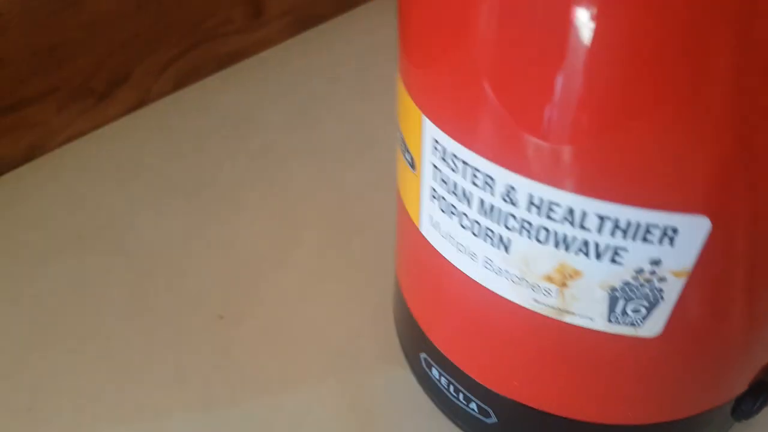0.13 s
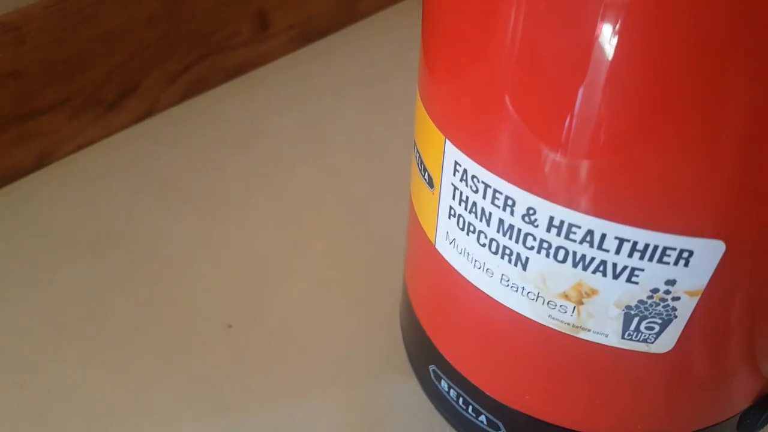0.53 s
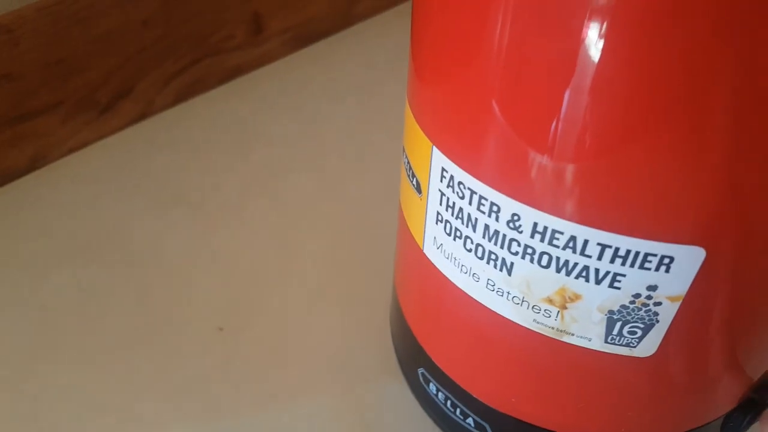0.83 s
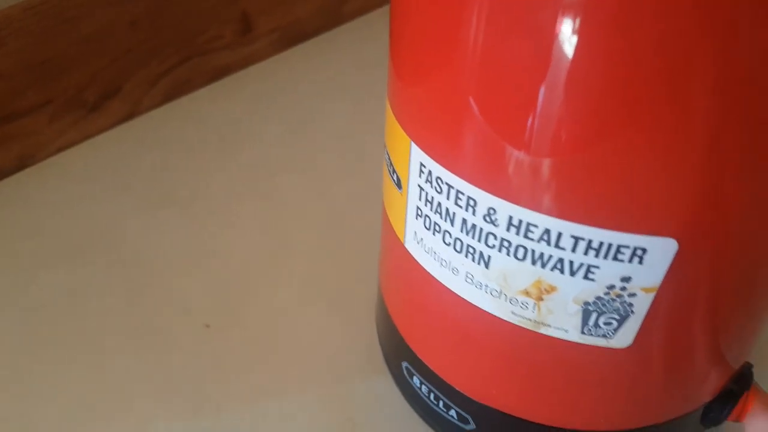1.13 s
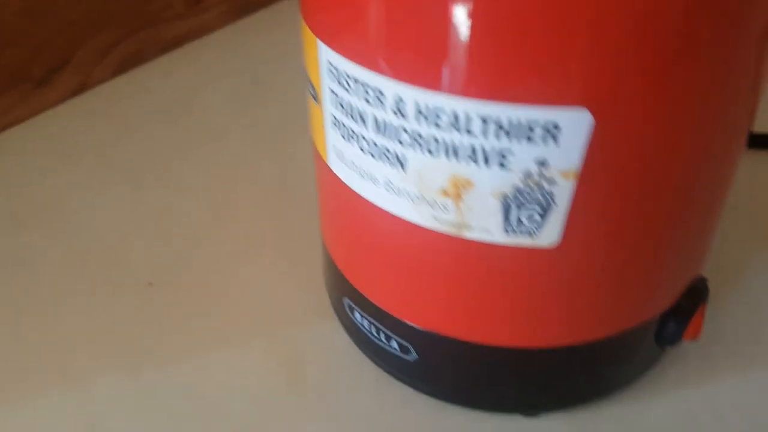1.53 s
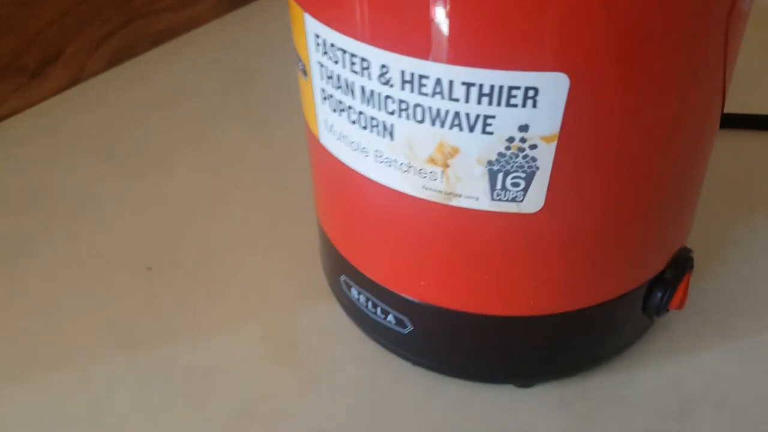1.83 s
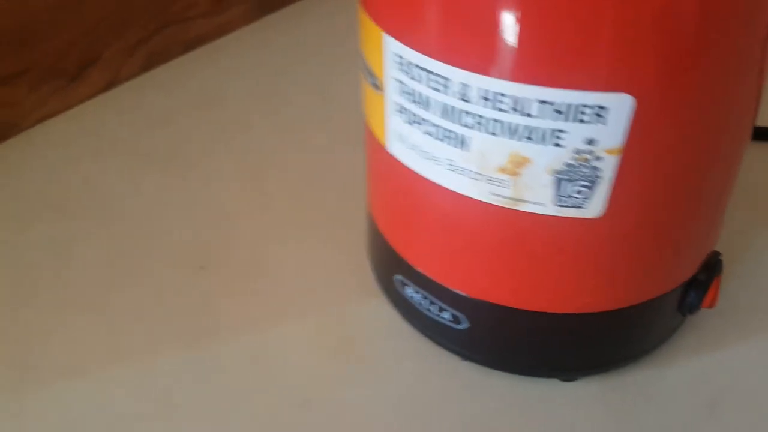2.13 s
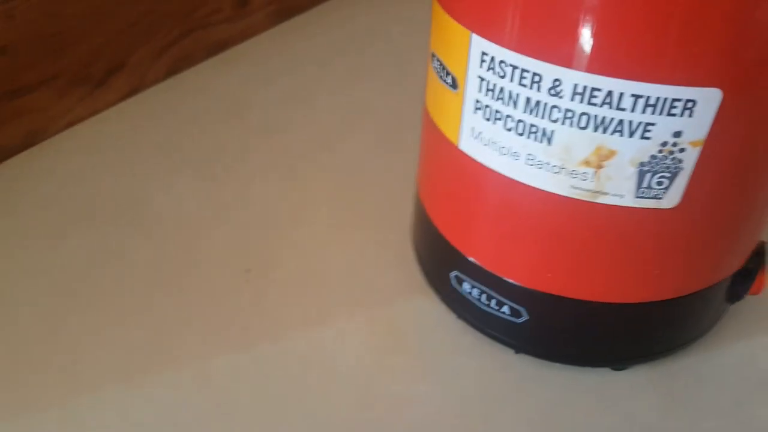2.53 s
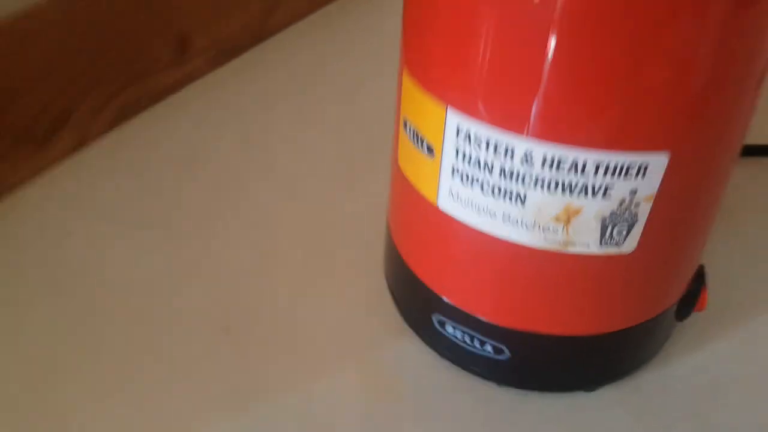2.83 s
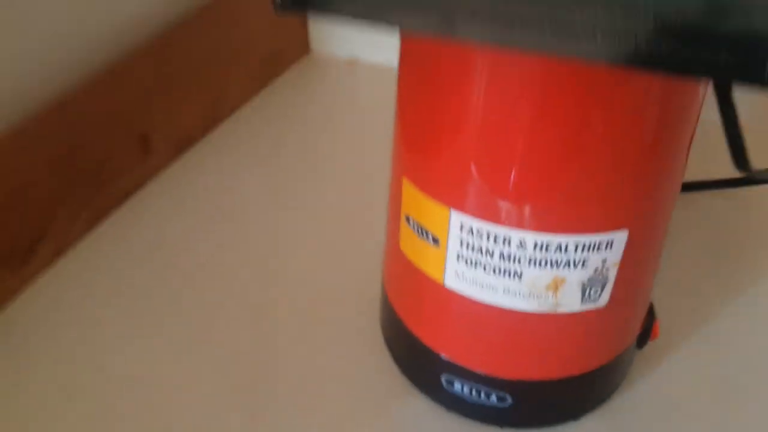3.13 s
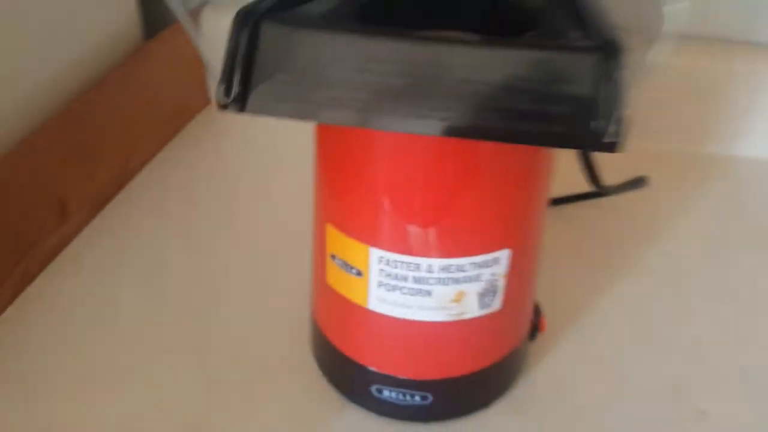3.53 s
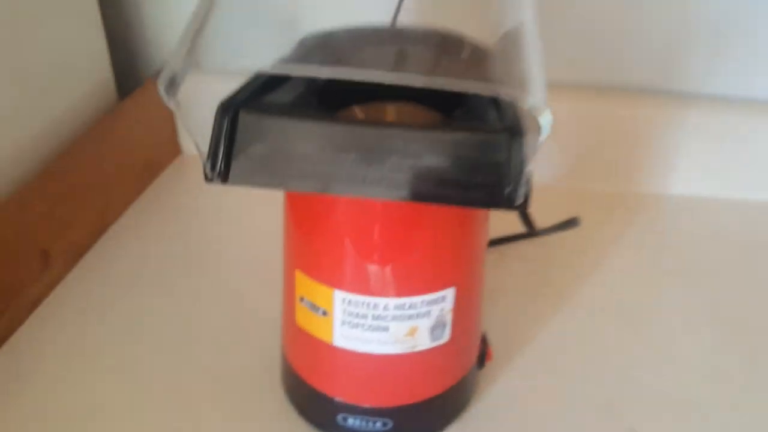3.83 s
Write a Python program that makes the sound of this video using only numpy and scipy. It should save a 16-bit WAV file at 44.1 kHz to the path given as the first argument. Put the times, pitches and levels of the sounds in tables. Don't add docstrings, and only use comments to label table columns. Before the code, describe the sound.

A hot air popcorn maker on a kitchen counter: quiet low room hum and faint handling, a loud plastic switch snap, then the motor whines up to a steady airy roar with swirling kernels, close handheld microphone.

```python
import sys
import numpy as np
from scipy import signal
from scipy.fft import rfft, irfft, next_fast_len
from scipy.io import wavfile
from scipy.ndimage import uniform_filter1d, map_coordinates

SR = 44100
rng = np.random.default_rng(int(sys.argv[2]) if len(sys.argv) > 2 else 0)


def file_out(sig):
    cols = np.atleast_2d(sig).T
    lim = np.clip(cols, -1, 1)
    pcm = np.round(lim * 32767).astype(np.int16)
    wavfile.write(sys.argv[1], SR, pcm)


def linear_from_db(decibels):
    return 10 ** (np.asarray(decibels, float) / 20)


N = 176400
T = np.arange(N) / SR

START_S, FULL_HZ, MAINS_HZ = 1.105, 210, 59.8
# (time [s], share of the view from above [0-1], distance gain [dB])
CAMERA = [
    (1.7, 0.13, 4.5),
    (2.3, 0.2, 3),
    (2.8, 0.5, 2.5),
    (3.3, 0.77, 2),
    (4, 0.96, 0.5),
]


def unit(x):
    return x / np.sqrt(np.mean(x ** 2) + 1e-20)


def along(points, hz):
    f, v = np.transpose(points)
    return np.interp(np.log(hz + 1), np.log(f + 1), v)


def curves(rows):
    s, *cols = np.transpose(rows)
    return [np.interp(T, s, c) for c in cols]


def wobble(rate_hz):
    return map_coordinates(rng.standard_normal(int(N * rate_hz / SR) + 4), [T * rate_hz])


def filtered(x, response):
    m = next_fast_len(N + SR // 2)
    return irfft(rfft(x, m) * response(np.fft.rfftfreq(m, 1 / SR)), m)[..., :N]


def bumps(peaks, hz):
    return linear_from_db(sum(db / (1 + (2 * (hz - c) / w) ** 2) for c, w, db in peaks))


def rush(colour, patchy_db):
    # (frequency [Hz], left-right likeness [0-1])
    likeness = [(60, 1), (250, 0.8), (700, 0.5), (1400, 0.3), (3000, 0.42), (9000, 0.06)]
    z = signal.stft(rng.standard_normal((2, N)), nperseg=512)[2]
    field = uniform_filter1d(rng.standard_normal(z.shape[1:]), 5, 0)
    field = uniform_filter1d(field, 12, 1)
    pair = signal.istft(z * linear_from_db(patchy_db * unit(field)), nperseg=512)[1][:, :N]

    def mid_side(hz):
        angle = np.arccos(np.clip(along(likeness, hz), -1, 1)) / 2
        return colour(hz) * np.array([np.cos(angle), np.sin(angle)])

    mid, side = filtered(pair, mid_side)
    return unit(np.array([mid + side, mid - side]))


def room_tone():
    # (frequency [Hz], density [dB per Hz])
    drone_colour = [(30, -26.5), (60, -14), (140, -5.5), (300, -6.5), (480, -10.5), (1100, -19.5),
                    (5000, -38.5), (9000, -65), (16000, -57)]
    # (centre [Hz], width [Hz], gain [dB])
    room_peaks = [(158.5, 33, 8.5), (312, 120, 8.5), (775, 15, 12.5)]
    # (frequency [Hz], density [dB per Hz])
    port_wind = [(15, 0), (40, 6), (100, -20), (250, -38)]
    drone = rush(lambda f: linear_from_db(along(drone_colour, f)) * bumps(room_peaks, f), patchy_db=-0.5)
    stir = filtered(rng.standard_normal((2, N)), lambda f: linear_from_db(along(port_wind, f)) * (f < 400))
    mains = linear_from_db(-51 + 3.2 * wobble(4.7)) * np.sin(2 * np.pi * MAINS_HZ * T)
    return linear_from_db(-57) * unit(stir) + linear_from_db(-41.5 + 0.32 * wobble(11.1)) * drone + mains


def kitchen(x):
    # (frequency [Hz], t60 [s])
    room_t60 = [(300, 0.9), (2000, 0.28), (10000, 0.23)]
    hz, t, z = signal.stft(rng.standard_normal((2, SR // 2)), SR, nperseg=256)
    decay = linear_from_db(-60 * t / along(room_t60, hz)[:, None])
    tail = signal.istft(z * decay, SR, nperseg=256)[1]
    delayed = np.pad(x, (60, 0))[None]
    return signal.fftconvolve(delayed, tail / np.linalg.norm(tail[0]), axes=1)[:, :N]


def handling():
    # (time [s], level [dB], frequency [Hz])
    knocks = [(.45, -40, 100), (.51, -38, 170), (1.185, -33, 125), (1.21, -35, 130), (1.285, -29, 90),
              (1.55, -42, 50), (1.75, -42, 55), (2.19, -36, 45), (2.5, -43, 50), (2.58, -45, 55),
              (2.71, -36, 48), (2.82, -43, 50), (2.91, -38, 50), (3.1, -39, 50), (3.4, -40, 50),
              (3.46, -42, 50), (3.56, -44, 50), (3.94, -38, 45)]
    # (time [s], length [s], level [dB], centre [Hz], width [octaves])
    rustles = [
        (0.05, 0.57, -62, 11000, 4.5),
        (0.085, 0.035, -56, 4130, .15),
        (0.225, 0.023, -60, 9900, .8),
        (0.26, 0.12, -48.5, 1180, 1.2),
        (0.415, 0.056, -64, 8500, 0.97),
        (0.46, 0.077, -55.5, 1500, 1.2),
        (0.77, 0.015, -70, 9500, .4),
    ]
    thump_s = 0.016
    out = np.zeros(N)
    for s, db, hz in knocks:
        out += linear_from_db(db) * np.sin(2 * np.pi * hz * (T - s)) * np.exp(-((T - s) / thump_s) ** 2)
    out = out * linear_from_db([[1], [-2]])
    for s, length_s, db, hz, octaves in rustles:
        cloth = filtered(rng.standard_normal((2, N)),
                         lambda f: np.exp(-(np.log2((f + 1) / hz) / octaves) ** 2))
        swell = linear_from_db(db + 2.1 * wobble(60.7)) * np.exp(-(2 * (T - s) / length_s) ** 2)
        out = out + swell * unit(cloth)
    return out


def switch():
    # (time [s], peak [dB], centre [Hz], t60 [s])
    contacts = [
        (0.2356, -27, 3900, 0.011),
        (0.628, -42, 2780, 0.023),
        (0.926, -46, 6000, 0.03),
        (0.956, -19, 3940, 0.026),
        (1.0515, -49, 2500, 0.026),
        (1.0978, -26, 3000, 0.016),
        (1.0999, -7, 6040, 0.017),
        (1.101, -2.5, 2650, 0.02),
    ]
    # (centre [Hz], width [Hz], gain [dB])
    plastic = [(664, 220, 24), (1450, 620, 7.5), (2300, 540, 4.5), (3200, 860, 4), (3740, 700, 2),
               (6700, 1400, 3)]
    octaves, slope_db, body_share = 1.15, 6, 0.083
    rise_s, crack_share, crack_t60_s, blow_t60_s = 0.00021, 0.61, 0.0015, 0.0044
    out, blows = np.zeros(N), np.zeros(N)
    for s, db, hz, t60 in contacts:
        t = np.maximum(T - s, 0)

        def colour(f):
            tilt_db = -slope_db * (np.log2((f + 1) / hz) / octaves) ** 2
            return body_share + bumps(plastic, f) * linear_from_db(tilt_db)

        burst = (1 - np.exp(-t / rise_s)) * unit(filtered(rng.standard_normal(N), colour))
        crack = 1 + crack_share * linear_from_db(-60 * t / crack_t60_s)
        out += linear_from_db(db - 11 - 60 * t / t60) * burst * crack
        blows += linear_from_db(db - 8 - 60 * t / blow_t60_s) * burst
    return out, blows


def kernels():
    # (time [s], activity [dB])
    swirl = [(1.5, -72), (1.72, -43.5), (1.8, -28.5), (1.88, -24.5), (1.91, -33), (2.14, -29.5),
             (2.195, -35.5), (2.23, -29), (2.7, -28.5), (3.25, -27.5), (3.4, -31.5), (3.6, -29.5),
             (4, -32.5)]
    # (time [s], peak [dB])
    surges = [(1.7583, -19), (1.7843, -24), (1.831, -13), (1.924, -9), (1.956, -12), (2.0227, -9),
              (2.0606, -13), (2.095, -9.5), (2.128, -10.5), (2.2153, -11), (2.2921, -18), (2.3465, -11),
              (2.4018, -16), (2.4901, -15.5), (2.5321, -12.5), (2.575, -20), (2.6134, -13.5),
              (2.6687, -14.5), (2.7062, -17), (2.7384, -11), (2.8309, -21), (2.88, -13), (2.9262, -15),
              (3.0, -12), (3.0893, -16), (3.1367, -24), (3.1821, -26), (3.212, -14.5), (3.2459, -15.5),
              (3.2918, -12), (3.441, -12.5), (3.505, -7.5), (3.5732, -25), (3.5996, -14.5), (3.671, -33),
              (3.6984, -12), (3.815, -7.5), (3.871, -10), (3.9299, -11.5), (3.9763, -29)]
    # (frequency [Hz], gain [dB])
    kernel_colour = [(500, -26), (1500, 6.5), (4000, -2), (6000, -3.5), (8600, -1), (11000, 1), (16000, 5)]
    # (centre [Hz], width [Hz], gain [dB])
    cup = [(4860, 53, 2), (7000, 120, 3), (7700, 150, 5), (8430, 510, 5.5), (9240, 92, 4.5)]
    grains_per_s, grain_hz, log_spread = 5000, 7510, 0.47
    surge_ref_db, rise_s, fall_s = -17.5, 0.001, 0.014

    count = 4 * grains_per_s
    hz = grain_hz * np.exp(log_spread * rng.standard_normal((count, 1)))
    hz = np.clip(hz, 1200, 17000)
    t = np.arange(48) / SR
    grain = np.sin(2 * np.pi * hz * t) * np.exp(-hz * t / 1.23)
    at = (rng.random((count, 1)) * N).astype(int) + np.arange(48)
    angle = 2 * np.pi * rng.random((count, 1))
    pair = np.array([np.bincount(at.ravel(), (grain * pan).ravel(), N + 48)[:N]
                     for pan in (np.cos(angle), np.sin(angle))])
    pair = unit(filtered(pair, lambda f: linear_from_db(along(kernel_colour, f)) * bumps(cup, f)))

    s, db = np.transpose(surges)
    starts = np.bincount((s * SR).astype(int), linear_from_db(2 * (db - surge_ref_db)), N)
    t = T[:SR // 4]
    pulse = (1 - np.exp(-t / rise_s)) * np.exp(-t / fall_s)
    thrown = np.abs(signal.fftconvolve(starts, pulse)[:N])
    level_db = curves(swirl)[0] + 5 + 0.5 * wobble(20) + wobble(55)
    return pair * np.sqrt(1 + thrown) * linear_from_db(level_db)


def speed():
    # (time [s], shaft speed [Hz])
    spin_up = [(1.18, 36), (1.24, 63), (1.31, 93), (1.4, 122), (1.5, 151), (1.59, 173), (1.69, 189),
               (1.76, 196), (1.87, 201), (2.14, 206), (2.6, 209), (4, 211.5)]
    return curves([(START_S, 0)] + list(spin_up))[0]


def strain():
    return np.clip(uniform_filter1d(np.gradient(speed()) * SR, SR // 10) / 250, 0, 1)


def roar():
    # (frequency [Hz], density [dB per Hz])
    roar_beside = [(35, -65), (60, -49), (119, -12.5), (245, -19), (396, -4), (533, -7), (1230, -5),
                   (1340, -11.5), (5000, -21.5), (6500, -44), (11000, -120)]
    roar_above = [(35, -61), (60, -16), (207, -21.5), (269, -20.5), (595, -13.5), (786, -15.5),
                  (862, -11.5), (1980, -18.5), (5000, -25.5), (6500, -30.5), (11000, -120)]
    # (centre [Hz], width [Hz], gain [dB])
    cavities_beside = [(365, 24, 9), (430, 60, 5), (730, 40, 9), (927, 36, 11), (1143, 130, 3),
                       (1565, 67, 8)]
    cavities_above = [(534, 100, 9), (612, 60, 13.5), (738, 55, 11.5), (910, 150, 8), (1140, 140, 7),
                      (1520, 370, 6)]
    # (frequency [Hz], density [dB per Hz])
    hiss = [(880, -36), (1500, -0.5), (1980, -12), (2140, -4.5), (8570, -16.5), (16000, -32)]
    share = np.clip(curves(CAMERA)[0], 0, 1)
    flow = speed() / FULL_HZ
    low = rush(lambda f: linear_from_db(along(roar_beside, f)) * bumps(cavities_beside, f), patchy_db=2.5)
    high = rush(lambda f: linear_from_db(along(roar_above, f)) * bumps(cavities_above, f), patchy_db=1.5)
    body = np.sqrt(1 - share) * low + np.sqrt(share) * high
    body = linear_from_db(-21 + 0.29 * wobble(6.46)) * flow ** 3.2 * body
    air = linear_from_db(-28.5) * flow ** 4.7 * rush(lambda f: linear_from_db(along(hiss, f)), patchy_db=-3.0)

    sweep_s, length_s, sweep_hz, hz_per_s = 3.02, 0.2, 1060, -1200
    t = T - sweep_s
    tone = np.sin(2 * np.pi * (sweep_hz + hz_per_s * t / 2) * t)
    sweep = linear_from_db(-30) * np.exp(-(2 * t / length_s) ** 2) * wobble(90) * tone
    return air + np.sqrt(2) * sweep + body


def whine():
    # (shaft order, level at full speed [dB], growth with speed [power], extra under strain [dB])
    orders = [(1, -53, 3, 21), (4, -32, 7, -5), (5, -36, 7, -8), (6, -33.5, 7, -6), (7, -42, 7, -8),
              (8, -50, 7, 29), (9, -43, 7, 15), (10, -49, 7, 26), (11, -54, 7, 30), (12, -60, 6, 27),
              (13, -64, 5, 26), (14, -71, 2.2, 29), (17, -77, 2, 28), (24, -77, 1.5, 33)]
    # (centre [Hz], width [Hz], gain [dB])
    housing = [(365, 50, 6), (930, 80, 3), (1520, 80, 14), (1760, 100, 11), (2150, 110, 12)]
    # (frequency [Hz], density [dB per Hz])
    chatter_colour = [(250, -12.5), (365, 4), (600, 2.5), (1200, -18), (1550, -11.5), (2300, -22),
                      (4000, -58)]
    beside_gain_db = {6: 5, 4: -9}
    waver_db, jitter_rad, rough_rad, side_drift_rad = 2.5, 0.28, 0.8, 0.2
    muffle_hz = 2400
    hz, load = speed(), strain()
    beside = 1 - np.clip(curves(CAMERA)[0], 0, 1)
    phase = 2 * np.pi * np.cumsum(hz) / SR

    tones = np.zeros((2, N))
    for k, db, law, extra_db in orders:
        level_db = db + extra_db * load + beside_gain_db.get(k, 0) * beside + waver_db * wobble(14)
        size = linear_from_db(level_db) * bumps(housing, k * hz) * (hz / FULL_HZ) ** law
        size = size / (1 + (k * hz / muffle_hz) ** 20)
        shake = jitter_rad * wobble(25.1) + rough_rad * load * wobble(70)
        drift = side_drift_rad * np.array([wobble(1.5), wobble(1.95)])
        tones += size * np.sin(k * phase + shake + drift)

    buzz = linear_from_db(-48 + 1.2 * wobble(5.46)) * np.sin(4 * np.pi * MAINS_HZ * T + 0.12 * wobble(12.0))
    buzz *= np.clip((T - START_S) / 0.059, 0, 1)
    chatter = rush(lambda f: linear_from_db(along(chatter_colour, f)) * bumps(housing, f), patchy_db=2.0)
    chatter = linear_from_db(-21) * load * (hz / FULL_HZ) ** 3.75 * chatter
    squeak_s, length_s, squeak_hz = 1.3, 0.1, 6100
    squeak = linear_from_db(-67 + 9.1 * wobble(39.4)) * np.sin(2 * np.pi * squeak_hz * T + 1.6 * wobble(300))
    squeak *= np.exp(-(2 * (T - squeak_s) / length_s) ** 2)
    return np.sqrt(2) * (tones + buzz) + chatter + squeak


def running_level(x):
    return np.sqrt(np.abs(uniform_filter1d(np.mean(x ** 2, 0), int(0.1 * SR))) + 1e-12)


def scene():
    # (frequency [Hz], left minus right [dB])
    lean = [(100, -4.5), (200, 5.5), (380, -2.5), (700, 3.5), (1290, -0.5), (2400, 1.5), (5000, -1),
            (15000, 0.5)]
    # (frequency [Hz], phase by which left leads [rad])
    lead = [(150, 0.53), (600, 0.36), (1100, 1), (4400, 1)]
    bass_cut_hz = 90
    sides = np.array([[0.5], [-0.5]])

    def placed(f):
        stereo = linear_from_db(along(lean, f) * sides) * np.exp(1j * along(lead, f) * sides)
        return stereo / (1 + (bass_cut_hz / (f + 1)) ** 6)

    machine = (whine() + roar()) * linear_from_db(curves(CAMERA)[1]) + kernels()
    machine = filtered(machine, placed)
    click, blows = switch()
    agc_from_db, agc_ratio = -25, 3.5
    over_db = np.clip(20 * np.log10(running_level(machine)) - agc_from_db, 0, 40)
    house = room_tone() * linear_from_db(-agc_ratio * over_db)
    return machine + click * linear_from_db([[2.5], [-2.5]]) + linear_from_db(3) * kitchen(blows) + handling() + house


def top_cut(x):
    return signal.sosfilt(signal.butter(12, 16670, fs=SR, output="sos"), x)


def record(dry):
    low_cut_hz, top_hz = 45, 15850
    band = filtered(dry, lambda f: (f < top_hz) * f ** 2 / (f ** 2 + low_cut_hz ** 2))
    return top_cut(band)


dry = scene()
out = record(dry)
file_out(out)
```